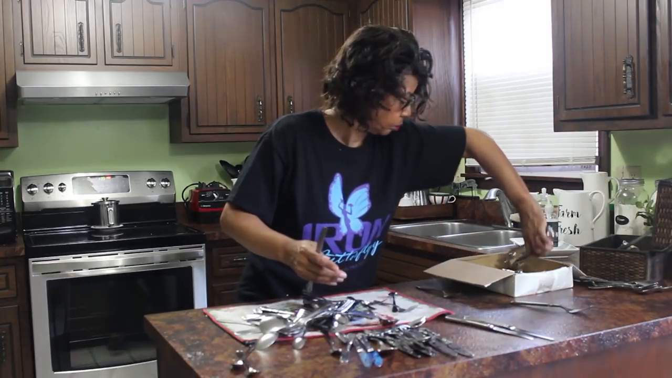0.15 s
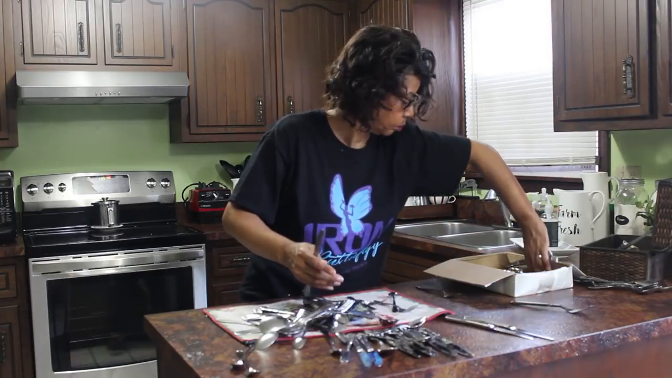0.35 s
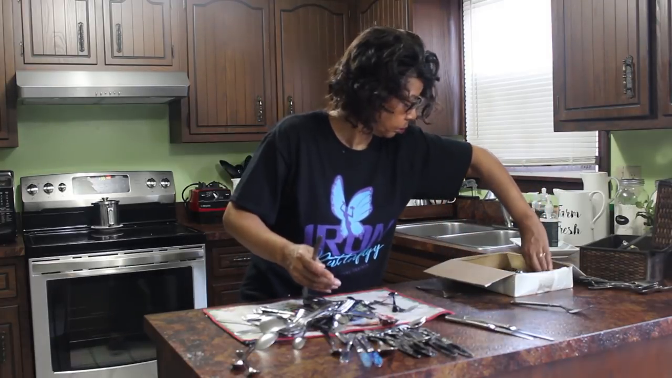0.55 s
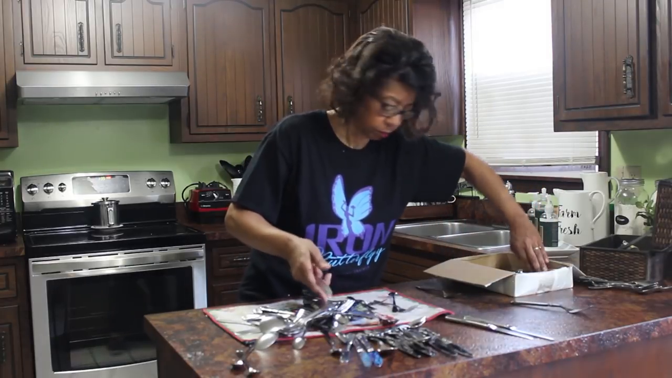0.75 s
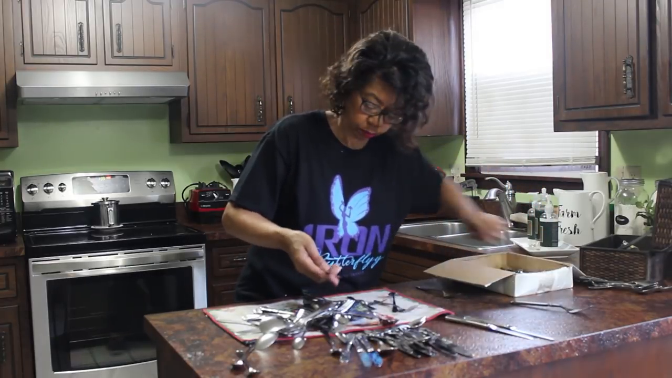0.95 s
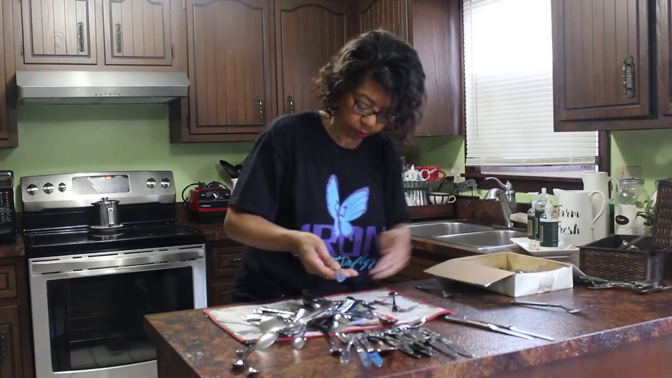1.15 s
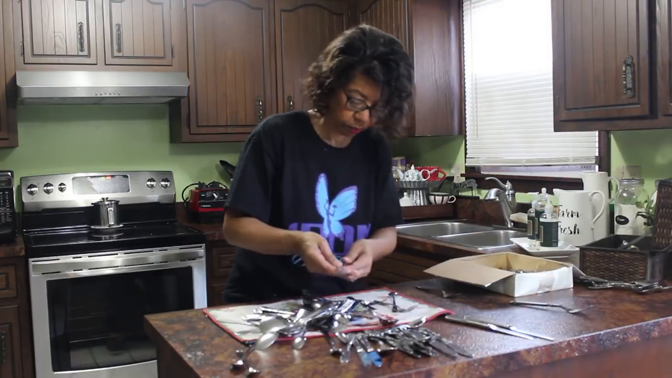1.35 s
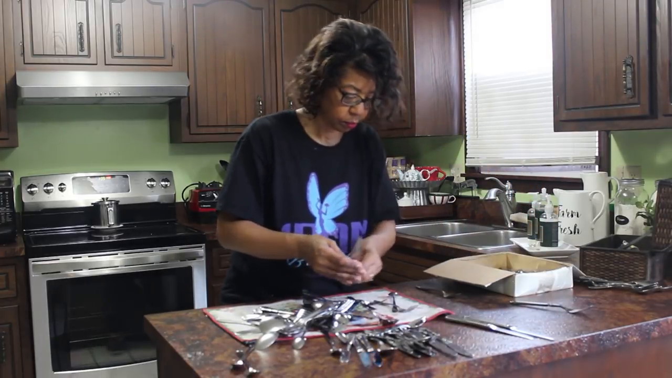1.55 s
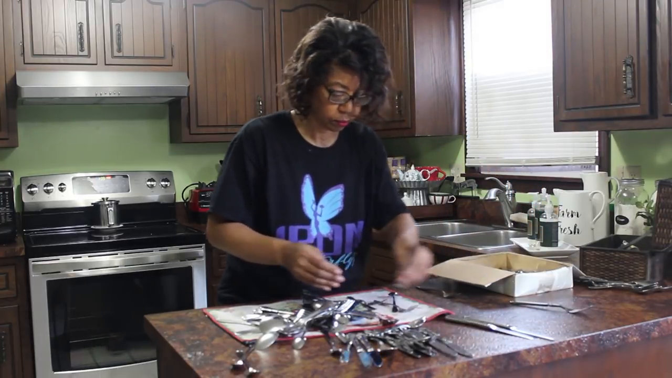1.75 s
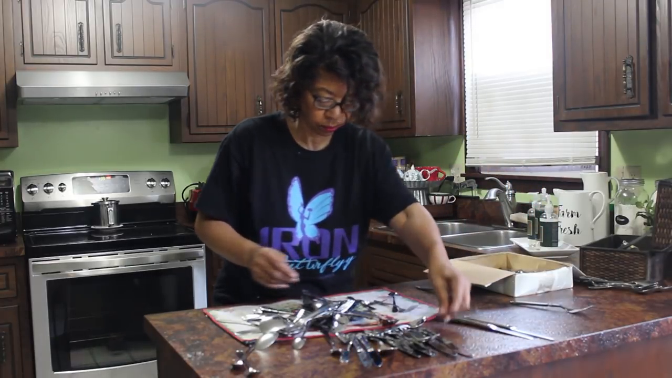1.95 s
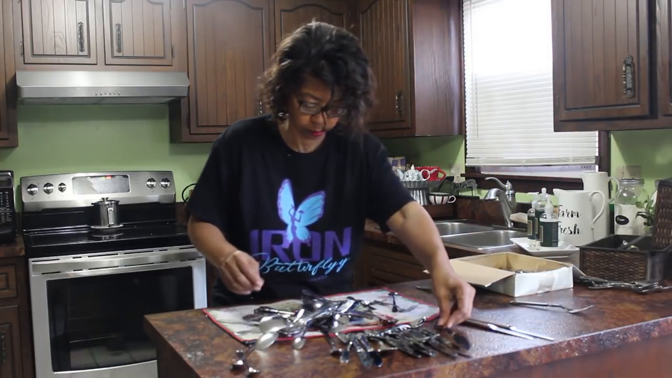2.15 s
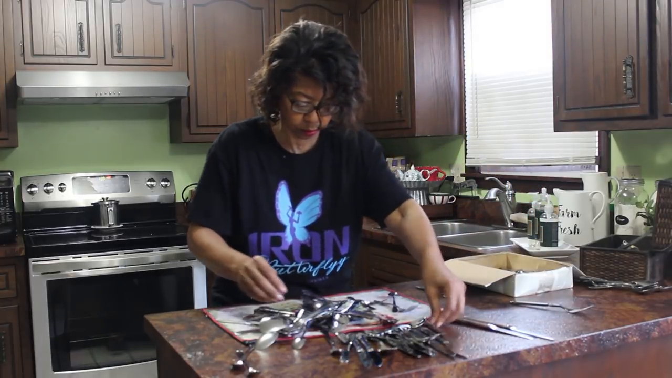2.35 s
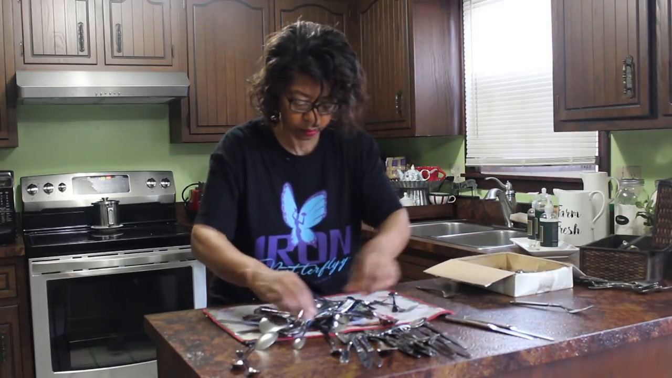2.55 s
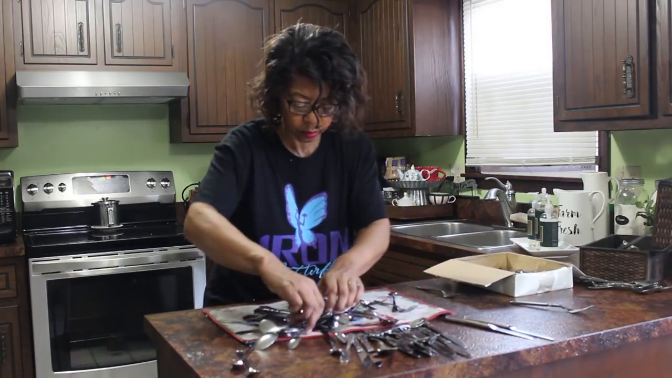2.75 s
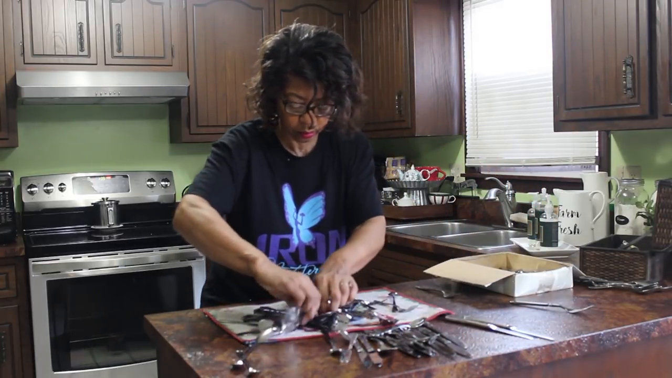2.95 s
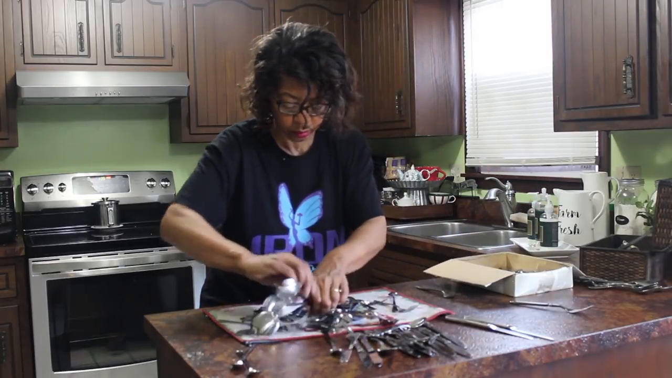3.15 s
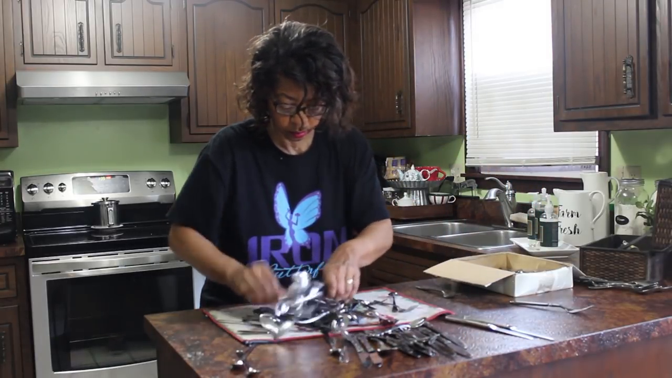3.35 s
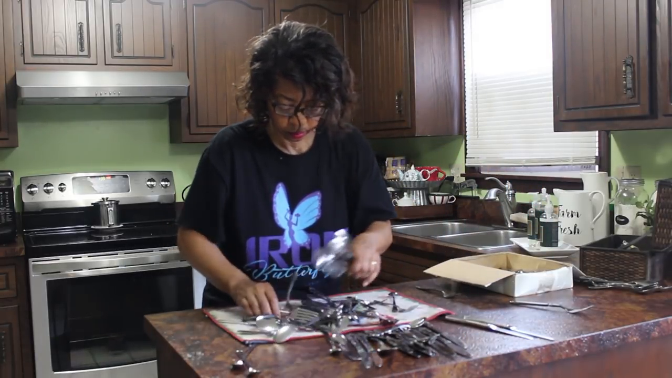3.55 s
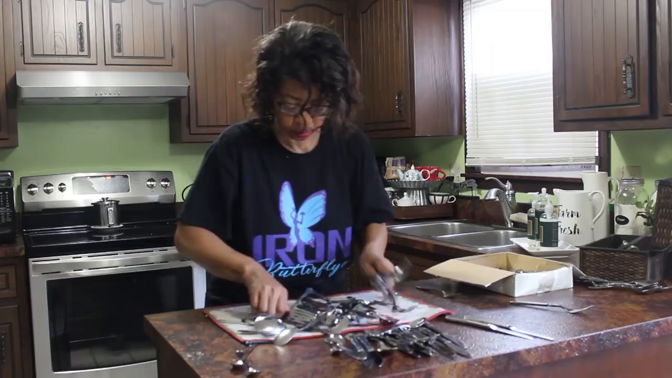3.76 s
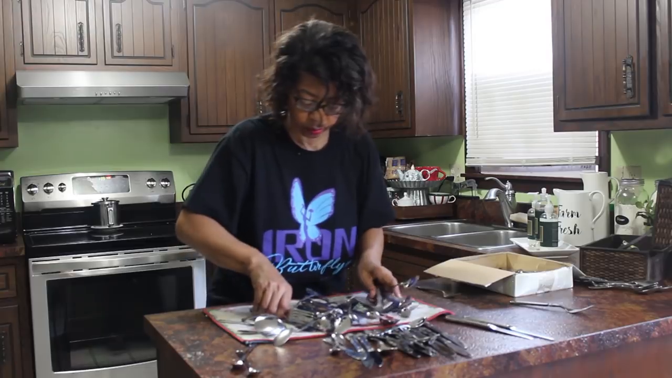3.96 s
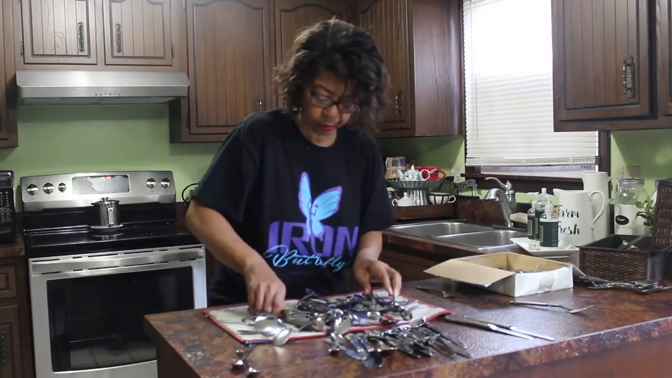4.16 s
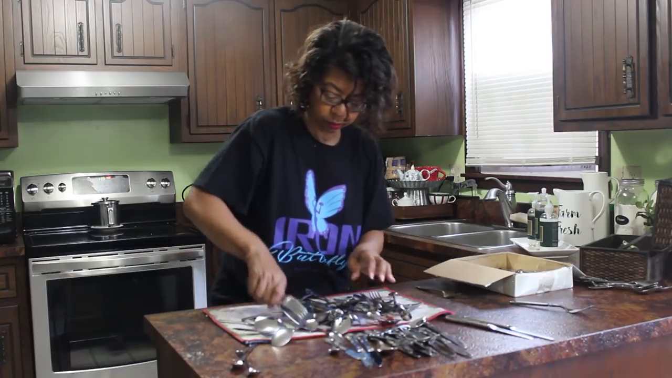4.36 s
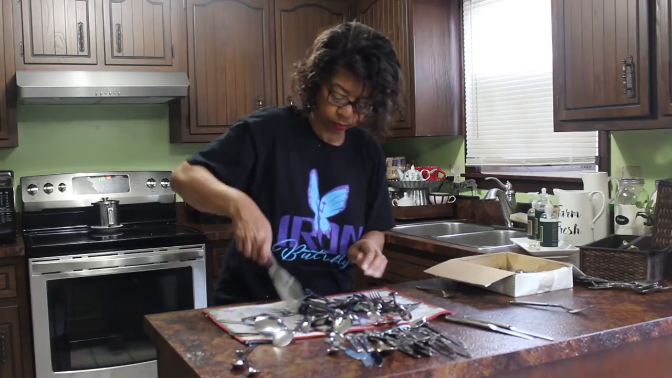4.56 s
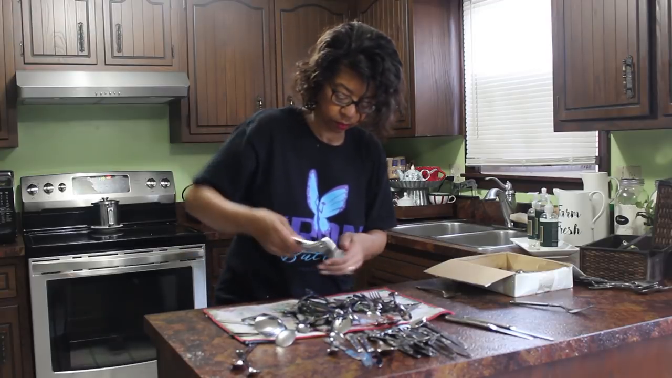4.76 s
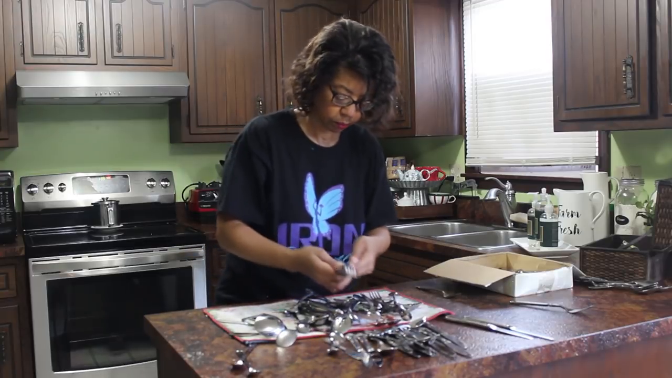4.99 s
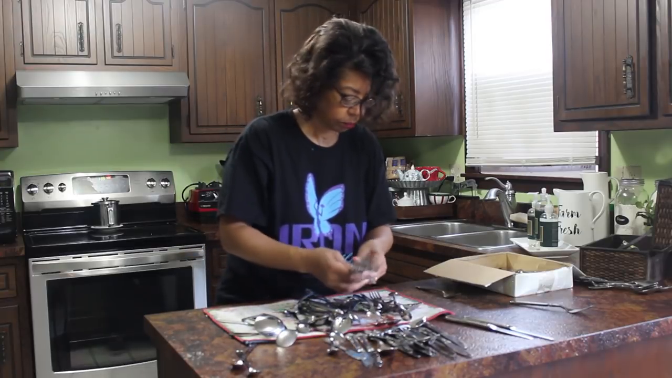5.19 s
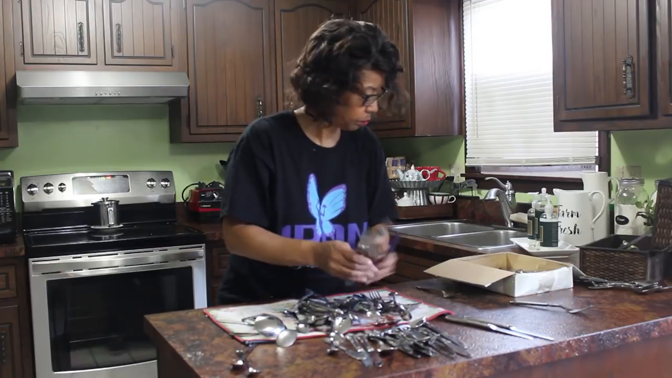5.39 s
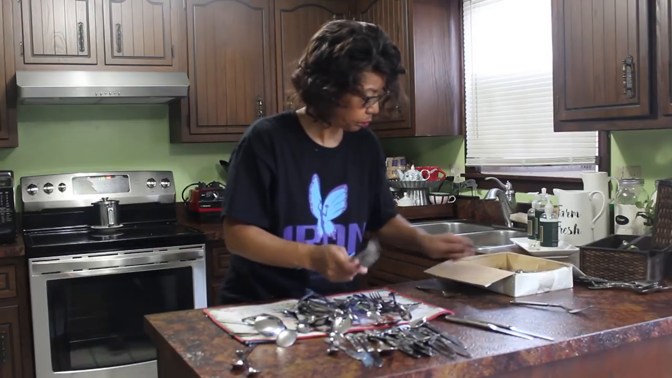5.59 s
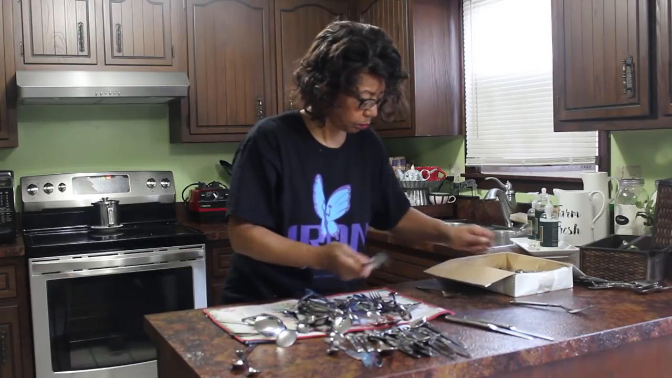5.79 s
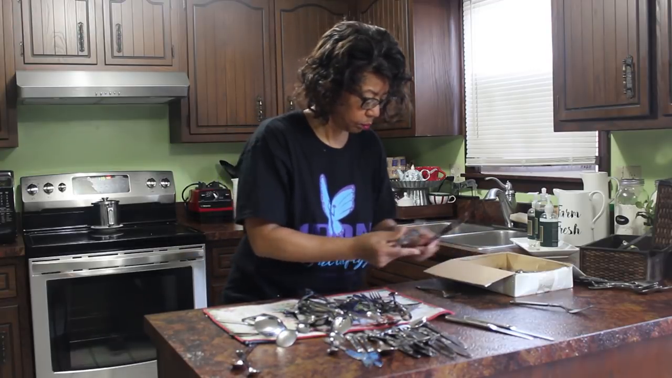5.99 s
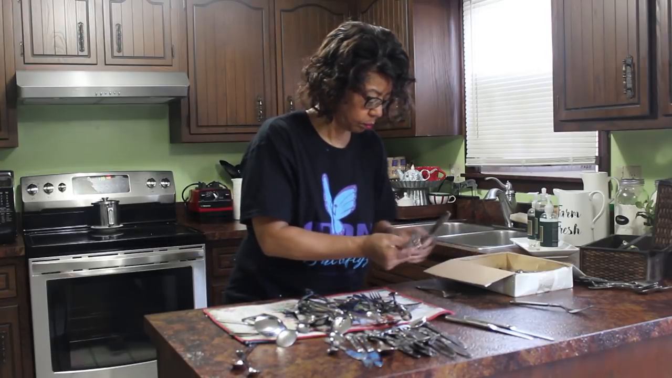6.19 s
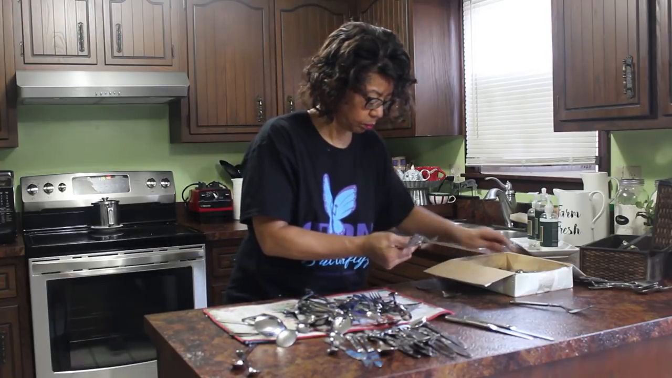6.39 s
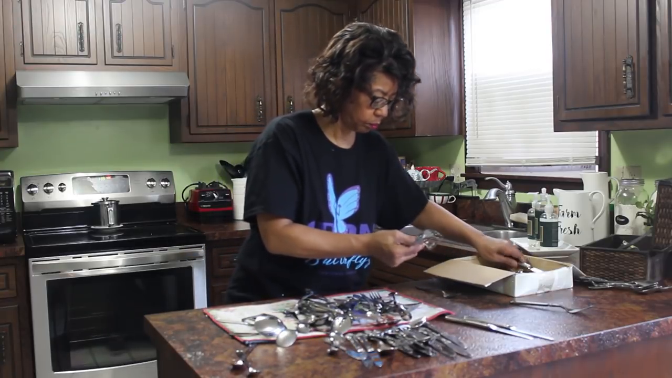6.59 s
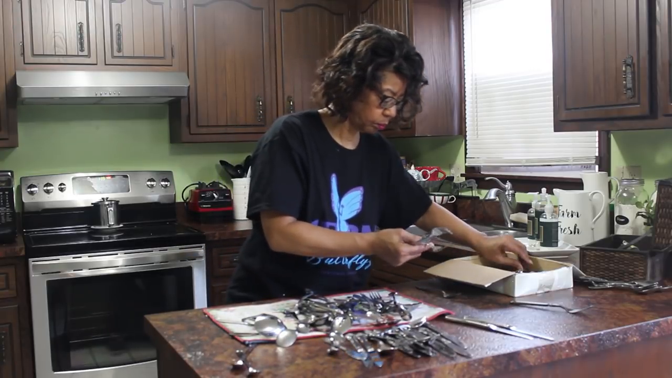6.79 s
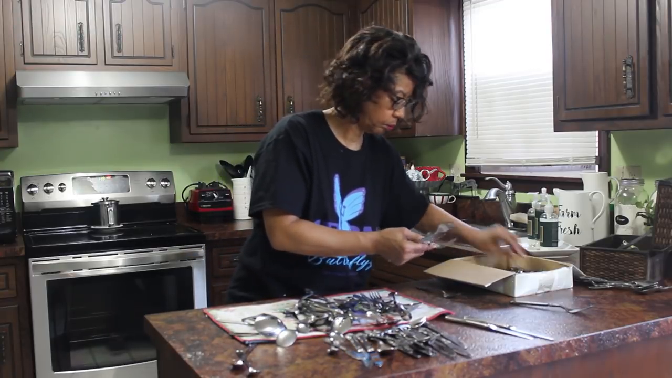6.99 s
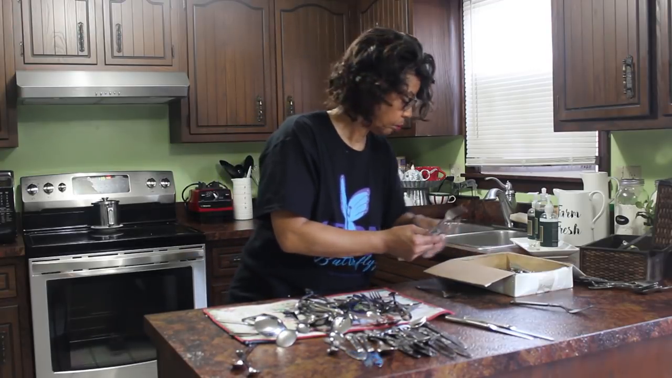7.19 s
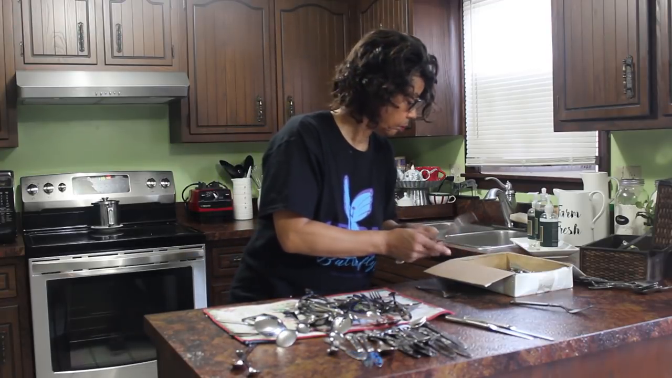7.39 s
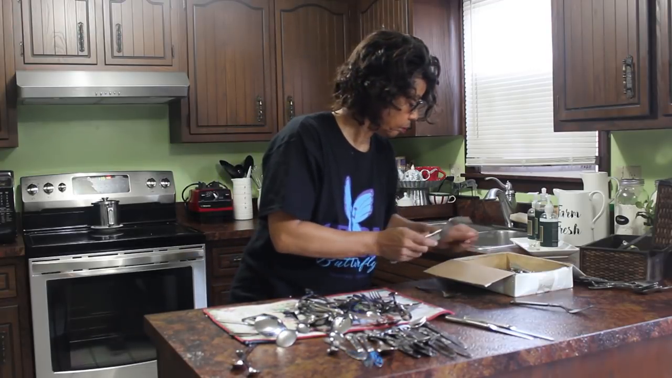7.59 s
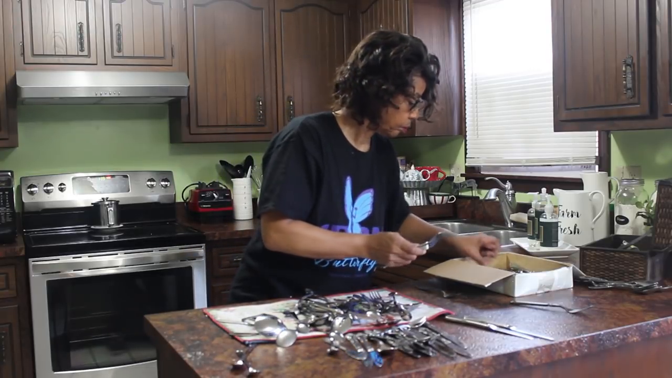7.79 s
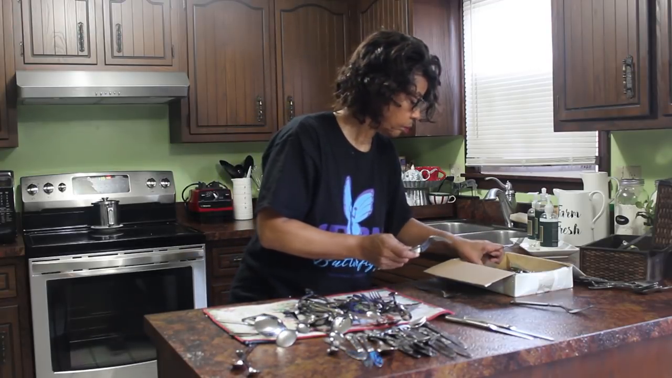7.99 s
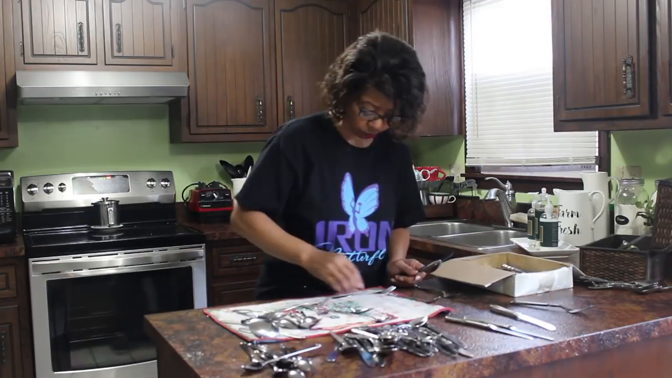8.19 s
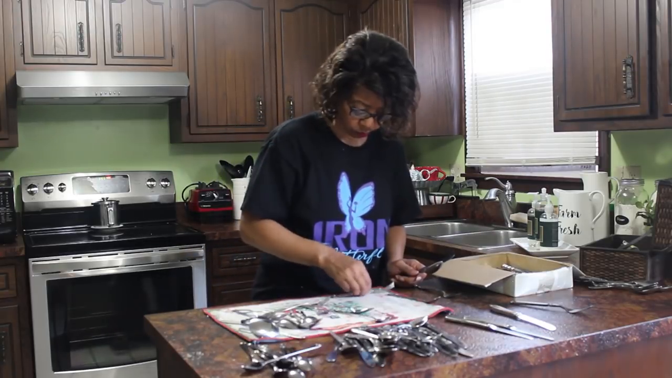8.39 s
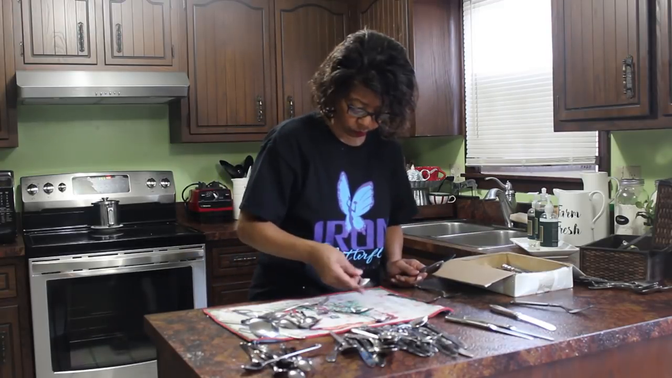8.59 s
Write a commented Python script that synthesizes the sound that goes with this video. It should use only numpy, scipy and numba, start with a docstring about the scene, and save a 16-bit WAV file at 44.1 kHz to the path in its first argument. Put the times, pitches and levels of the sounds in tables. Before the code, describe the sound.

From the start, steel cutlery clinks sharply and quickly, thickening into a bright jangling clatter between 0.4 and 1.2 seconds, with woody knocks underneath. The ring fades into near quiet over a low fridge hum. At 2.1 a hard snap lands, then a knife drops and bounces around 2.25 to 2.45. From 2.7 to 4.7 hands rake through the heap: dense, overlapping rattles and scraping jostle, short high pings, and dull counter bumps near 3.9 and 4.4 to 4.5. It thins by 5, with tiny ticks and a clearer clink near 5.5. A single bright clink comes at 6.1, then a firm cluster from 6.65 to 6.85 with a hard knock. Light, fading clinks continue from 7 to 8.15, where the sound cuts abruptly, leaving only hum and soft room noise. Close microphone, hard-walled kitchen with short echo, nearly mono.

```python
"""A kitchen counter, close up: hands sort steel forks, spoons and knives and drop them in a cardboard box.
Every contact chatters for a few milliseconds and rings the pieces as damped sines; counter and box knock
underneath; an edit cuts off the last rustle. A hard kitchen echoes it, as decaying noise, over a fridge hum;
the camera's gain control ducks the hum in loud spells."""
import sys
import numpy as np
from scipy import signal
from scipy.fft import rfft, irfft, next_fast_len
from scipy.io import wavfile
from scipy.ndimage import uniform_filter1d
from numba import njit

SR = 44100
rng = np.random.default_rng(int(sys.argv[2]) if len(sys.argv) > 2 else 0)


def persist_wave(psi):
    """Save psi, clipped to +-1, as 16-bit WAV."""
    counts = np.round(np.clip(psi, -1, 1) * 32767).astype(np.int16)
    wavfile.write(sys.argv[1], SR, np.atleast_2d(counts).T)


def elevation(decibels):
    """Turn decibel levels (scalar or array-like) into linear amplitude ratios."""
    levels = np.asarray(decibels, float)
    return 10 ** (levels / 20)


N = 381006

# Colour of a short clash of steel on steel. Each row: frequency in Hz, level in dB.
STEEL_COLOUR = [(1180, -44), (2000, -8.5), (3170, -1), (4300, -4), (5730, -9.5), (6640, -7), (7570, -13.5),
                (8550, -10.5), (13500, -11), (16000, -13.5)]
# Colour of a knock of counter and box. Each row: frequency in Hz, level in dB.
WOOD_COLOUR = [(180, -43), (300, -26), (734, -3), (1350, 4), (1840, 1.5), (1990, 2), (3200, 0), (4500, -35),
               (5850, -48), (9900, -120)]


def read(table, hz):
    """Reads a (Hz, value) table on a log-frequency axis."""
    f, value = np.transpose(table)
    return np.interp(np.log(np.maximum(hz, 1)), np.log(f), value)


def high_pass(x, hz, order=4):
    """Steep high-pass."""
    return signal.sosfilt(signal.butter(order, hz, "high", fs=SR, output="sos"), x)


@njit
def ring(n, s, hz, t60, size):
    """Adds up damped sines, each a decaying rotation run until it has lost 54 dB."""
    out = np.zeros(n)
    for k in range(len(s)):
        start = int(s[k] * SR)
        stop = min(n, start + int(.9 * t60[k] * SR))
        z = size[k] + 0j
        turn = np.exp(2j * np.pi * hz[k] / SR - np.log(1000) / (t60[k] * SR))
        for j in range(start, stop):
            out[j] += z.imag
            z *= turn
    return out


def strike(s, hz, t60, db):
    """Rings arrays of (contact, partial) shape as damped sines, none decaying in under 2 ms."""
    settings = np.broadcast_arrays(s, np.clip(hz, 40, .45 * SR), np.clip(t60, .002, 3), elevation(db))
    return ring(N, *[np.ravel(v) * 1. for v in settings])


def clash(s, db, colour, lo_hz, hi_hz, t60, spread_s, treble_db=0, free=0, count=24, sudden=1):
    """Many unrelated partials, set off while the contact chatters; most are choked at once, a few ring free."""
    u = rng.random((len(s), count, 4))
    hz = lo_hz + (hi_hz - lo_hz) * u[..., 0]
    # the treble setting fades in from 4.5 to 8.5 kHz
    tilt = np.reshape(treble_db, (-1, 1)) * np.clip((hz - 4500) / 4000, 0, 1)
    gain_db = db[:, None] + read(colour, hz) + tilt - 12 * u[..., 3]
    # a sudden contact is hardest at first touch, a gradual one builds up and fades
    gradual = (u[..., 1] + rng.random(hz.shape)) / 2
    lag = sudden * u[..., 1] ** 2 + (1 - sudden) * gradual
    decay_s = t60 * (0.64 + 0.5 * u[..., 2] + free * u[..., 2] ** 9)
    return strike(s[:, None] + spread_s * lag, hz, decay_s, gain_db)


def spells(at):
    """Steel and knock level at each moment: a spell swells fast, holds, and settles; the strongest rules."""
    # Pieces sliding and jostling under the hands.
    # Each row: start in seconds, length in seconds, steel level in dB, knock level in dB.
    handling = [(0.14, 0.089, -50, -28), (0.226, 0.097, -13.5, -21.5), (0.438, 0.47, -19.5, -31.5),
                (1.132, 0.047, -17, -29), (2.264, 0.29, -46, -31.5), (2.733, 0.23, -25, -31.5),
                (2.95, 0.15, -19, -29.5), (3.23, 0.24, -16.5, -44), (3.53, 0.34, -20.5, -33),
                (3.787, 0.31, -16, -30.5), (4.16, 0.18, -13, -34.5), (4.4, 0.076, -16, -26),
                (4.519, 0.074, -10, -22), (4.637, 0.18, -24.5, -34.5), (5.31, 0.38, -42.5, -65),
                (6.758, 0.18, -19.5, -34.5), (7.25, 0.81, -52.5, -64), (7.946, 0.27, -49.5, -47.5)]
    swell_db_per_s, settle_db_per_s = 250, 151
    start, length, steel_db, knock_db = np.transpose(handling)[..., None]
    before_db = swell_db_per_s * np.maximum(start - at, 0)
    after_db = settle_db_per_s * np.maximum(at - start - length, 0)
    loss_db = before_db + after_db
    return (steel_db - loss_db).max(axis=0), (knock_db - loss_db).max(axis=0)


def pieces(s, db, scatter_db, spread_s, damp, treble_db=0):
    """Each contact rings the handful then in play; a random draw decides which few partials speak."""
    # Partials of the pieces being handled, one list a handful.
    # Each row: frequency in Hz, level in dB against the strongest of its list.
    handfuls = [
        [(2972, -47), (4151, -31), (7424, -31.5), (7655, -34), (8656, -28), (9448, -30), (11520, -29.5),
         (12985, -32), (15084, -38)],
        [(3435, -33), (6799, -54), (8371, -56), (9647, -47.5), (10045, -61), (11434, -50), (12242, -55),
         (12618, -55), (13867, -38), (14228, -56), (15176, -37)],
        [(2530, -47), (6621, -53), (8312, -54), (8457, -37), (11908, -34.5), (12225, -50), (12936, -29),
         (13076, -40), (14486, -30), (15439, -40)],
        [(5292, -41.5), (6417, -58), (6595, -43.5), (6912, -41.5), (8053, -42), (8231, -61), (10519, -39),
         (11919, -39), (12931, -48), (13098, -39), (14465, -35), (15369, -53)],
        [(3015, -42), (5313, -36), (6455, -37.5), (7171, -38), (8893, -37), (11386, -41), (12683, -51),
         (13566, -57), (15208, -54)],
    ]
    # One value a handful: first moment in seconds, base decay time (t60) in seconds, level in dB.
    from_s = [0, 2, 3.14, 4.04, 5.2]
    base_t60 = [0.34, 0.39, 0.061, 0.46, 0.061]
    handful_db = [0, -14, 11.5, 1, 4.5]
    out, which = 0, np.searchsorted(from_s, s, side="right") - 1
    u = rng.random((len(s), 16, 3))
    for k, table in enumerate(handfuls):
        hz, line_db = np.transpose(table)
        mine = which == k
        v = u[mine, :len(hz)]
        tilt = (treble_db + 0 * s)[mine, None] * (hz > 5000)
        level_db = line_db - line_db.max() + handful_db[k]
        gain_db = db[mine, None] + level_db - scatter_db * np.sqrt(v[..., 0]) + tilt
        # high partials die sooner; like pieces differ a little in pitch
        t60 = damp * base_t60[k] * (6000 / hz) ** 0.2
        pitch_hz = hz * (1 + 0.0148 * (v[..., 2] - .5))
        out = out + strike(s[mine, None] + spread_s * v[..., 1], pitch_hz, t60, gain_db)
    return out


def clinks():
    """The clear contacts: a sharp tick, a leading partial, the rest of the handful, the clash and the knock."""
    # Each row: start in seconds, level in dB, leading partial in Hz,
    # knock in dB against that level, treble tilt in dB.
    contacts = [(0.0708, -5.5, 3120, -5.5, -15.5), (0.1152, -5, 4200, -9.5, -10.5),
                (0.1786, 0.5, 4270, -9, -9.5), (0.1938, 1.5, 3880, -12, -15), (0.29, 0, 3960, -17, -11),
                (0.4313, 3, 3380, -8.5, -14), (0.4555, -6, 2770, -3.5, -16), (0.5357, -2, 3050, -9, -7.5),
                (0.5618, 8.5, 3230, -9, -12.5), (.6064, 9, 4060, -19, -12), (0.6271, -3, 4000, -1, -0.5),
                (.709, 0, 4240, -24, -13.5), (0.763, 3.5, 3000, -13, -11.5), (0.85, -4.5, 3570, -10, -16),
                (0.9615, -0.5, 4200, -14.5, -18), (1.0071, 3, 3060, -13.5, -10.5),
                (1.099, 6, 4160, -15.5, -13), (1.124, 2, 2660, -52, -10.5), (2.1195, -5, 2840, 1.5, -42),
                (2.244, -6, 5900, -10, -14), (2.261, -7.5, 3340, -5, -14), (2.276, -6, 5970, -5, -9),
                (2.42, -12, 2660, 5, -9), (2.43, -11.5, 3360, 7, -4), (2.512, -13, 3440, -3, -9.5),
                (2.694, -8.5, 2800, -13, -10), (2.7219, -2, 3390, -24, -9.5),
                (2.7764, 1.5, 3570, -19, -15.5), (2.797, -5, 3230, -34, -13), (2.8196, 2, 3500, -18, -14),
                (2.8637, 0, 4500, -14.5, -12), (2.9189, 0, 3550, -34, -18), (2.9368, 4, 3610, -32, -10),
                (2.95, -3, 3080, -37, -18), (3.016, 0.5, 3350, -76, -13.5), (3.047, 0.5, 4370, -20, -9),
                (3.085, -0.5, 3090, -37, -9), (3.1197, 2, 4060, -37, -8), (3.156, 2, 3000, -43, -14),
                (3.189, -9, 3300, -25, 0.5), (3.2155, 1, 4270, -22, -9.5), (3.2724, -9, 4400, -34, 4.5),
                (3.3128, 3, 5130, -38, -10), (3.482, -8, 3550, -9.5, -13), (3.527, -17, 2780, -24.5, 2.5),
                (3.565, -3, 3730, -32, -10), (3.6144, -3.5, 3560, -9, -21), (3.706, -2.5, 3740, -12, -16),
                (3.8431, -3, 3620, -19, -15), (3.9043, -4, 3800, -6, -5), (3.914, -2, 3620, -7, -8),
                (3.935, -13, 3450, 5, -14), (3.965, 7, 4000, -33, -10), (4.0576, 6, 3240, -33, -12),
                (4.146, 1, 3470, -20, -13), (4.199, -2, 3450, -43, -8), (4.291, -9, 5160, -40, -2.5),
                (4.4492, -1, 2840, -13, -10.5), (4.5407, 4, 2900, -44, -10), (4.6168, -1.5, 4200, -19, -11),
                (4.6897, 2, 2670, -39, -10.5), (4.778, -3.5, 2970, -32, -12),
                (4.871, -13, 3220, -29, -21.5), (4.9539, -7.5, 4240, -22, -10),
                (4.9734, -7, 4250, -43, -17.5), (5.0592, -25, 4020, -28, -10),
                (5.3264, -27.5, 4140, -26, -5.5), (5.4228, -24, 4740, -41, -0.5),
                (5.44, -15, 3940, -42, -17), (5.528, -10, 3900, -21, -5), (5.532, -3, 4290, -40, -18),
                (5.61, -37, 4200, -36, 2), (5.656, -34.5, 4770, -34, 1), (5.7048, -33, 3160, 5.5, -28),
                (5.856, -33, 4470, -30, 2), (5.865, -13, 4540, -25, -12), (5.8998, -30, 5000, -37, -20),
                (5.95, -27.5, 4870, -1.5, -26), (6.1243, 1.5, 3300, -28, -17.5),
                (6.186, -25, 4200, -16, -19), (6.2033, -9.5, 3460, -17, -6.5),
                (6.2267, -1.5, 3260, -30, -28), (6.336, -26, 3040, -21.5, -20),
                (6.6466, 1, 3016, -17, -12.5), (6.6783, -0.5, 3000, -15, -11.5),
                (6.717, -0.5, 3110, -10.5, -15), (6.787, -17, 3120, 2.5, -18),
                (6.801, -10.5, 3300, -49, -9), (6.8264, -1, 5200, -42, -16), (6.854, 6, 3160, -15, -8),
                (6.992, -7, 3180, -12, -16), (7.0596, -11, 3160, -10.5, -13.5),
                (7.0821, -8.5, 5060, -10, -12.5), (7.2107, -18, 3220, -13.5, -17),
                (7.322, -23, 3950, -29, -18), (7.3695, -19.5, 5900, -32, -13),
                (7.473, -16.5, 3300, -29, -15), (7.498, -11, 3470, -20.5, -12.5),
                (7.5295, -10.5, 3250, -39, -24), (7.575, -18.5, 3080, -34, -17),
                (7.7144, -22.5, 3340, -30, -13.5), (7.735, -18.5, 4600, -21, -22),
                (8.089, -25, 2840, -17, -22), (8.1201, -14.5, 4750, -12, -24),
                (8.1518, -17.5, 3060, -10, -17.5)]
    s, db, hz, knock_db, treble_db = np.transpose(contacts)
    # deep in the heap a contact is muffled and chatters longer than one between lone pieces
    heap = spells(s)[0] > -30
    chatter_s = np.where(heap, .02, .012)[:, None]
    sudden = np.where(heap, .65, 1)[:, None]
    tick_db = db - np.where(heap, 16, 9)
    tick = clash(s, tick_db, STEEL_COLOUR, 2850, 15340, 0.011, 0.0034, treble_db + 18)
    lead = strike(s, hz, .05, db - np.where(heap, 17, 15.5))
    handful = pieces(s, db - 11.0, 16.2, .012, 0.73, treble_db + 10.0)
    steel = clash(s, db - 12.0, STEEL_COLOUR, 2709, 15800, 0.024, chatter_s, treble_db + 15.0,
                  free=3.3, count=110, sudden=sudden)
    # a firm landing knocks at once, a glancing one rumbles through the pile
    drag_s = np.where(knock_db > -9, .006, .035)[:, None]
    knock = clash(s, db + knock_db - 13.5, WOOD_COLOUR, 513, 4180, 0.027, drag_s, count=60)
    return high_pass(tick + lead + handful + steel, 2330, order=8) + knock


def jostle():
    """A dense random stream of light contacts, a few much harder than the rest."""
    per_second = 380
    count = int(per_second * N / SR)
    at = (np.arange(count) + rng.random(count)) / per_second
    steel_db, knock_db = spells(at)
    force_db = 12 * rng.random(count) ** 4
    blow_db = steel_db + force_db
    steel = clash(at, blow_db - 4.5, STEEL_COLOUR, 2600, 15800, 0.026, .0015, free=3.8, count=13)
    knock = clash(at, knock_db + force_db - 5.0, WOOD_COLOUR, 408, 2720, 0.021, 0.00292, count=6)
    # every sixth contact rings the handful
    handful = pieces(at[::6], blow_db[::6] - 0.5, 27.5, 0.0048, 0.25)
    return high_pass(steel, 1810, order=8) + knock + handful


def pings():
    """Single tones that stand out of the clatter, as damped sines; each has a close twin and beats with it."""
    # Some tones are brief, some ring on.
    # Each row: start in seconds, level in dB, frequency in Hz, decay time (t60) in seconds.
    tones = [(0.119, -19.5, 9950, 1.5), (0.184, -7.5, 7580, 0.41), (0.289, -8.5, 7655, .2),
             (0.072, -18, 1300, 0.07), (0.107, -15, 1337, 0.089), (0.564, -12, 1445, 0.1),
             (0.612, -15, 1470, .2), (.685, -18, 4850, 0.3), (.7, -20, 3420, 0.66), (0.181, -17, 7424, 0.5),
             (0.607, -5, 4160, 0.3), (0.691, -16, 4151, .3), (0.781, -26, 4180, 0.45),
             (0.964, -10, 9410, 0.12), (1.299, -51.5, 1948, 2.4), (2.12, -10.5, 1784, 0.073),
             (2.122, -11, 3120, .09), (2.432, -23, 8420, 0.43), (2.431, -30, 4457, 0.77),
             (2.449, -33, 3435, 0.46), (2.426, -16.5, 1264, 0.17), (2.43, -15.5, 759, 0.19),
             (2.431, -23, 9960, 0.55), (2.43, -25, 12400, 0.46), (2.429, -35, 3864, 1.1),
             (3.214, -19, 1610, 0.06), (3.273, -15.5, 1610, 0.13), (3.335, -20, 1615, 0.18),
             (3.272, -15.5, 2507, 0.28), (3.19, -12, 8430, 0.091), (3.276, -3.5, 6690, 0.1),
             (3.275, -22, 10000, .12), (4.056, -5.5, 3240, 0.11), (4.161, -32, 1014, 1.4),
             (4.16, -19, 6340, 0.49), (4.45, -15, 8000, 0.77), (4.54, -9.5, 8240, 0.43),
             (4.691, -20, 5310, 0.19), (5.481, -33, 8840, 0.67), (5.33, -26, 11700, 0.07),
             (5.534, -9.5, 11500, 0.038), (5.56, -31, 6500, 0.25), (5.87, -39, 3240, 0.22),
             (6.125, -8, 11500, 0.035), (6.19, -28, 12700, .2), (6.206, -26, 8940, 0.4),
             (6.229, -29, 3180, 0.16), (6.648, -18, 12500, 0.23), (7.37, -33, 6510, 0.16),
             (7.468, -30, 8800, 0.13), (7.499, -28, 13900, .2), (7.736, -49, 6460, 0.25)]
    s, db, hz, t60 = np.transpose(tones)
    u = rng.random((len(s), 2))
    twin_hz = hz * (1 + (0.001 + 0.0021 * u[:, 0]) * np.sign(u[:, 1] - .5))
    return strike(s, hz, t60, db - 2.5) + strike(s + .004, twin_hz, 0.67 * t60, db - 9.5)


def knife():
    """A knife dropped on the counter: every bounce rings the same partials, a little differently weighted."""
    # Each row: start in seconds, level in dB.
    bounces = [(2.245, -13), (2.261, -11), (2.276, -23), (2.42, -20)]
    # Each row: frequency in Hz, level in dB, decay time (t60) in seconds.
    blade = [(6000, -8, .07), (6250, -21, 0.19), (7806, -7, 0.077), (9620, -1.5, 0.2), (11070, -24, 0.42),
             (11420, -1, 0.13), (12280, -13, .07), (13600, -1, 0.092), (14300, -6, 0.23), (15800, -5, .07)]
    s, db = np.transpose(bounces)[..., None]
    hz, line_db, t60 = np.transpose(blade)
    return strike(s, hz, t60, db + line_db - 6.2 * rng.random((len(s), len(hz))))


def snaps():
    """Hard edges snapping on the counter: a short pulse that dies in 2 ms, within a few cycles."""
    # Each row: start in seconds, level in dB, pitch in Hz.
    edge_hits = [(2.12, 1, 2300), (2.281, 0, 2500), (3.2165, 3, 2600), (3.273, -3, 2200), (6.7853, 4, 1500)]
    s, db, hz = np.transpose(edge_hits)
    return strike(s, hz, .002, db)


def thumps():
    """Soft blows: a low, quickly damped pair of counter modes."""
    # Hands and box bumping the counter.
    # Each row: start in seconds, level in dB, pitch in Hz, decay time (t60) in seconds.
    bumps = [(0.161, -15, 430, 0.088), (0.559, -18, 327, 0.035), (2.423, -27, 285, 0.12),
             (3.62, -37, 320, 0.072), (3.903, -13, 217, 0.031), (3.936, -19, 150, 0.092),
             (4.226, -19, 293, 0.038), (4.385, -17, 137, 0.1), (4.44, -23, 127, 0.075),
             (4.497, -11.5, 129, 0.092), (4.536, -18, 114, 0.1), (6.785, -29, 370, 0.041)]
    s, db, hz, t60 = np.transpose(bumps)
    low = strike(s, hz, t60, db)
    high = strike(s, 1.7 * hz, 0.95 * t60, db - 16.0)
    return high_pass(low + high, 72)


def echo():
    """Tail of a hard room: octave bands of noise, each with its own decay, starting after the nearest wall."""
    # Each row: frequency in Hz, decay time (t60) in seconds.
    room_t60 = [(250, 0.97), (1000, 0.33), (3500, 0.5), (9000, 0.33), (15000, 0.23)]
    t = np.arange(int(.7 * SR)) / SR
    edges = 90 * 2. ** np.arange(8.5)
    edges[-1] = .45 * SR
    tail = 0
    for lo, hi in zip(edges, edges[1:]):
        sos = signal.butter(2, [lo, hi], "band", fs=SR, output="sos")
        band = signal.sosfilt(sos, rng.standard_normal(len(t)))
        tail = tail + band * elevation(-60 * t / read(room_t60, np.sqrt(lo * hi)))
    tail = tail * np.clip((t - .002) / 0.0091, 0, 1)  # silent for 2 ms, then fades in
    return tail / np.sqrt(np.sum(tail ** 2))


def room_noise():
    """Broad room and microphone noise: white noise coloured in the spectrum, at -42.5 dB rms."""
    # Each row: frequency in Hz, relative level in dB.
    colour = [(25, -54), (45, -28), (62, -12), (100, -13), (150, -10.5), (391, -12), (480, -15), (520, -21),
              (870, -21), (1120, -26.5), (2300, -33.5), (3200, -30.5), (4000, -38), (6000, -40),
              (16000, -41.5)]
    size = next_fast_len(N)
    hz = np.arange(size // 2 + 1) * SR / size
    x = irfft(rfft(rng.standard_normal(size)) * elevation(read(colour, hz)), size)[:N]
    return elevation(-42.5) * x / x.std()


def kitchen():
    """Fridge hum, a sine whose level wavers slightly, over the room noise."""
    hum_hz, hum_db, waver_db = 119.8, -42, 0.77
    t = np.arange(N) / SR
    waver = uniform_filter1d(rng.standard_normal(N), 3000) * np.sqrt(3000)  # rms near 1
    return room_noise() + elevation(hum_db + waver_db * waver) * np.sin(2 * np.pi * hum_hz * t)


def scene():
    """Direct sound plus echo, almost the same at both microphone ports."""
    near = high_pass(clinks() + jostle(), 250) + pings() + knife() + snaps()
    before_cut = np.arange(N) < 8.164 * SR  # an edit cuts the handling and its echo here
    echo_mid = elevation(-2.5) * signal.fftconvolve(near, echo())[:N]
    echo_side = elevation(-43.5) * signal.fftconvolve(near, echo())[:N]
    mid = (near + echo_mid) * before_cut + thumps() + kitchen()
    side = echo_side * before_cut + elevation(-22.5) * room_noise()
    return mid + side * np.array([[1], [-1]])


@njit
def duck(x, top, ratio, attack, release):
    """Gain control: follows the level, turns down what exceeds the threshold."""
    gain, level = np.ones(len(x)), 0.
    for i in range(len(x)):
        a = abs(x[i])
        level += (a - level) * (attack if a > level else release)
        if level > top:
            gain[i] = (top / level) ** (1 - 1 / ratio)
    return gain


def roll_off(x):
    """The treble ends steeply here."""
    return signal.sosfilt(signal.butter(12, 17000, fs=SR, output="sos"), x)


def record(dry):
    """The camera cuts rumble and top, turns down just after loud hits, recovers slowly and clips the peaks."""
    attack_s, release_s, lag_s, smooth_s = 0.00081, .3, 0.019, 0.013
    gain = duck(dry.mean(axis=0), elevation(-13.0), 2.62, 1 / (attack_s * SR), 1 / (release_s * SR))
    lag = int(lag_s * SR)
    late_gain = np.r_[np.ones(lag), gain[:N - lag]]
    gain = uniform_filter1d(late_gain, int(smooth_s * SR))
    low_pass = signal.ellip(8, .2, 22, 15800, fs=SR, output="sos")
    mix = high_pass(signal.sosfilt(low_pass, dry), 40) * gain
    return roll_off(np.clip(mix, -1, 1))


dry = scene()
out = record(dry)
persist_wave(out)
```